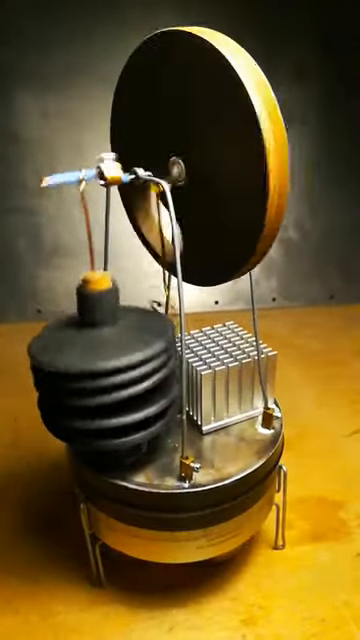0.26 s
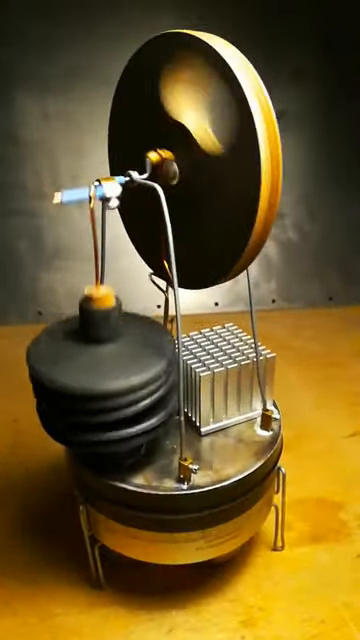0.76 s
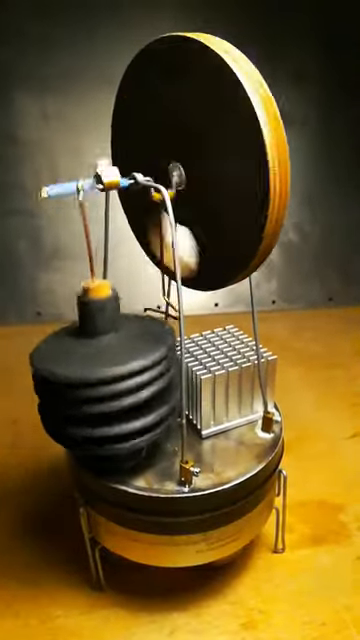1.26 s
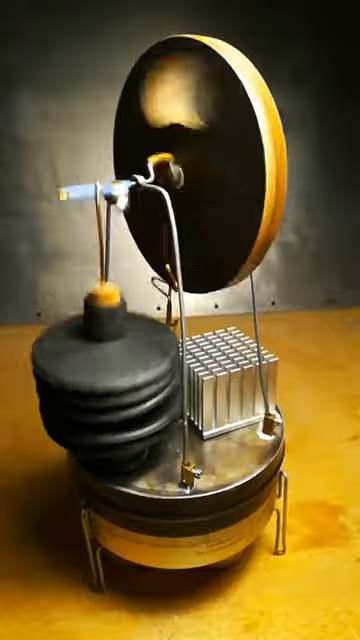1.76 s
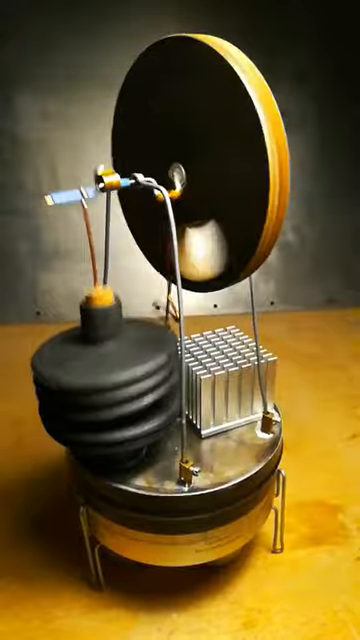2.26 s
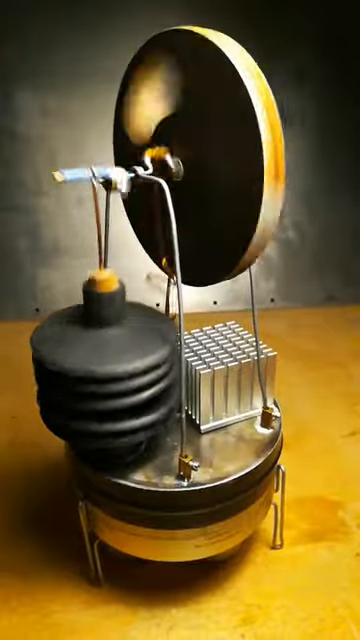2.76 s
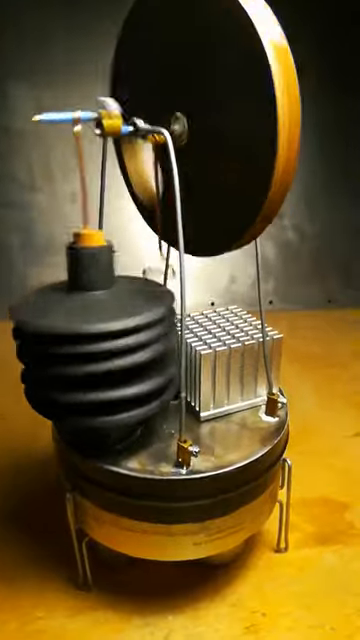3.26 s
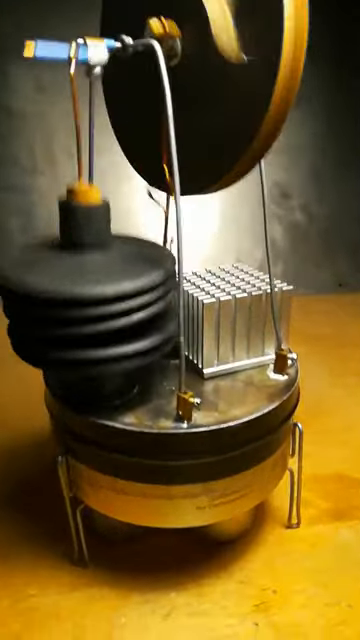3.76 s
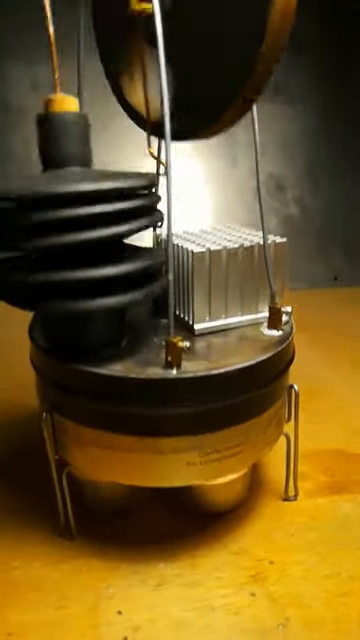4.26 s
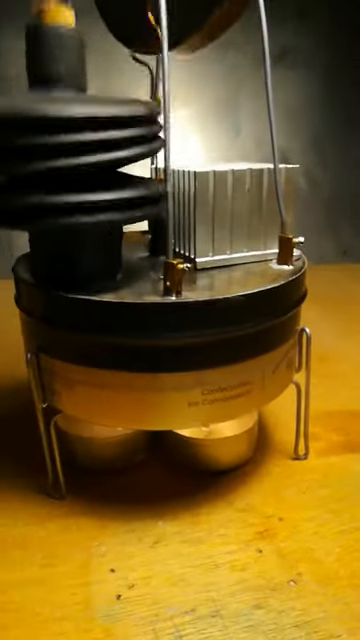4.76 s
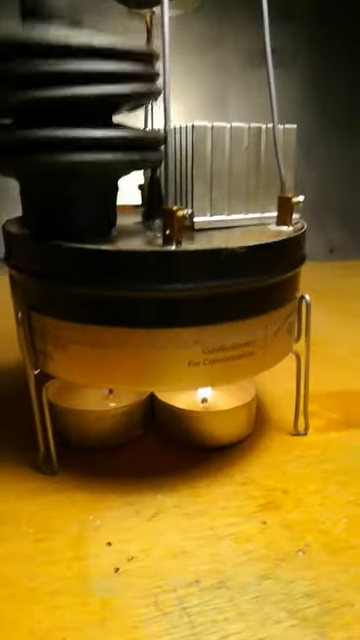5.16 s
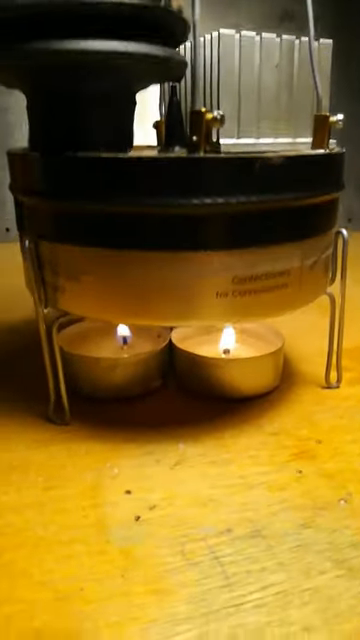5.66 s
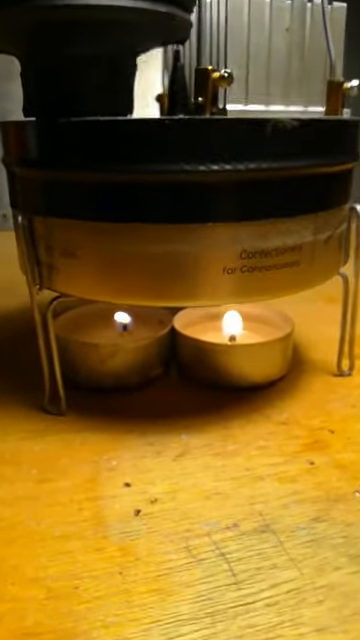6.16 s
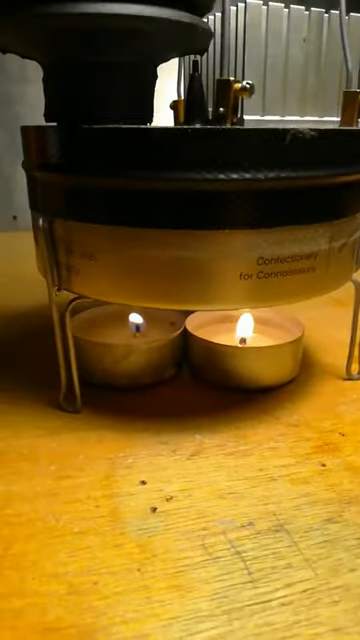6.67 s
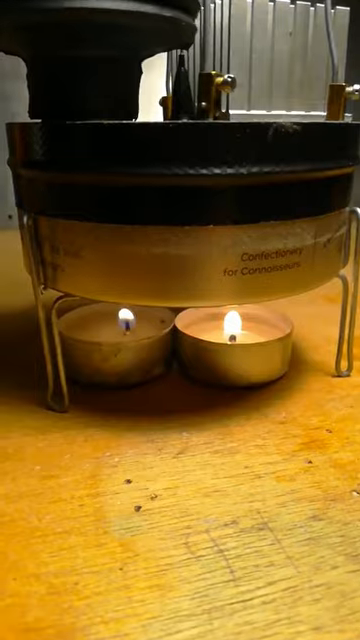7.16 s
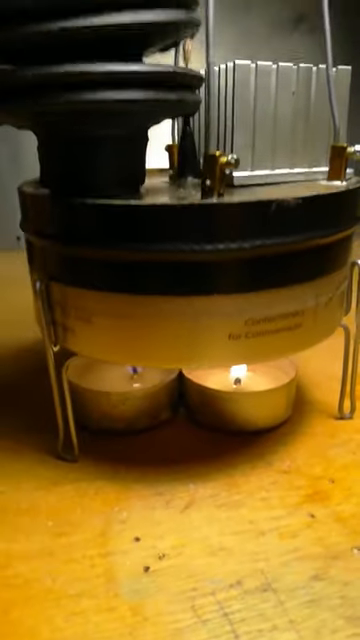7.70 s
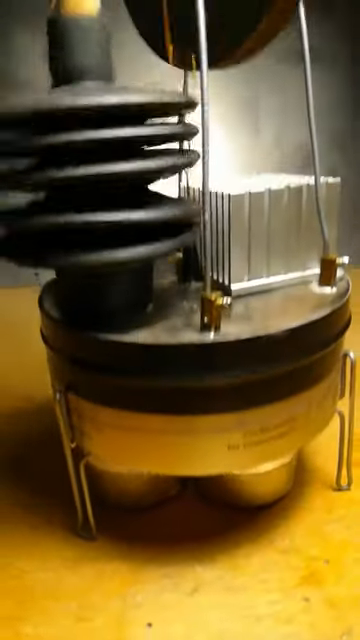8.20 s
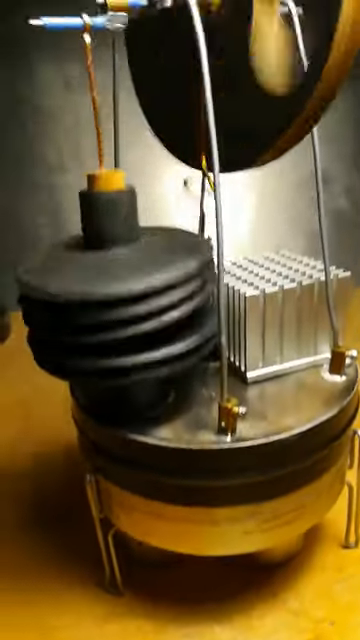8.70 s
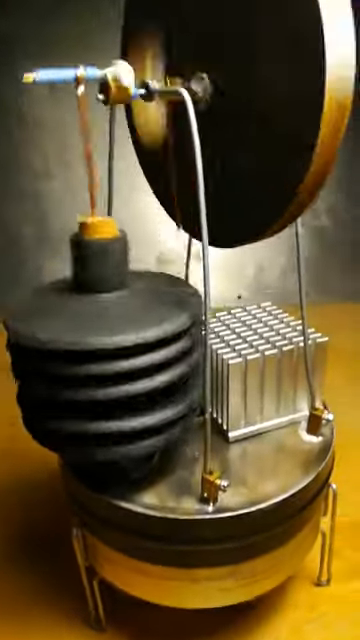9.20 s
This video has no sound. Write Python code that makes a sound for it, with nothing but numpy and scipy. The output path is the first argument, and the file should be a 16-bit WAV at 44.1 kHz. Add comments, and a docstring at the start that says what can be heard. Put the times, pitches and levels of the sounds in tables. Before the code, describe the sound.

A small homemade hot-air engine runs steadily, its loose wire linkage ticking and knocking five times a second over faint low room rumble.

```python
"""A rebound rattles over a low room rumble, then a small hot-air engine made from a tin runs on.
At five turns a second its loose linkage ticks, catches, knocks and rebounds; tin and wire frame ring.
Clicks and noise drive decaying modes and hissing bands; bright bursts are wire joints, a throb is the bench.
A hand-held two-port microphone sinks from above the tin to bench level and rises again."""
import sys
import numpy as np
from scipy import signal
from scipy.io import wavfile

SR = 44100
rng = np.random.default_rng(int(sys.argv[2]) if len(sys.argv) > 2 else 0)


def volts_from_decibels(level):
    """Turn decibel levels (scalar or array-like) into linear amplitude factors."""
    exponent = np.asarray(level, float) / 20
    return 10 ** exponent


def dump_mix(stems):
    """Bounce the given channels to the path in sys.argv[1] as a 16-bit WAV at rate SR."""
    frames = np.atleast_2d(stems).T  # one column per channel
    limited = np.clip(frames, -1, 1)  # hard clip at full scale
    pcm = np.round(limited * 32767).astype(np.int16)
    wavfile.write(sys.argv[1], SR, pcm)


N = 416304   # samples, about 9.44 s

# microphone height: t/s, share of the way down (0 above the tin, 1 bench level)
MIC_LOWERED = [(0, 0.02), (3.6, 0.06), (4.3, 0.32), (4.9, 0.78), (5.7, 0.91), (7.7, 1), (8.2, 0.86),
               (8.9, 0.1), (9.44, 0.1)]
# half of a left-minus-right difference goes to each port
SIDES = np.array([[.5], [-.5]])

# room noise density: f/Hz, relative level/dB per Hz
ROOM_SPECTRUM = [(15, -42), (25, -3), (82, 15.5), (427, -3.5), (516, 2.5), (1070, -2), (2110, -17),
                 (2690, -18.5), (5280, -22.5), (7110, -26), (10400, -29), (14000, -38), (16000, -50)]
# how alike the room sounds at both ports: f/Hz, likeness (1 = the same)
ROOM_LIKENESS = [(60, 0.84), (130, 1), (300, 0.44), (800, 0.1), (3000, .01)]
ROOM_DB = -51.5   # whole room noise, rms
# bench modes: f/Hz, level/dB, t60/s
BENCH_MODES = [(69.8, -50, 0.41), (75, -54, 0.39), (86.6, -54.5, 0.56), (130.7, -49, 0.67),
               (158.1, -47, 0.51), (200, -53.5, 0.2)]

# bright bursts of the wire joints: t/s, level/dB
SNAP_LEVEL = [(0, -55), (2.5, -51), (5, -45), (7.5, -44), (9.44, -42)]
SNAP_BEFORE_KNOCK_S, SNAP_T60_S, SNAP_SCATTER_DB = 0.008, 0.034, 2.5
CONTACT_SNAP_DB = -4.5   # relative to the burst before the knock
SNAP_FROM_DB = -42   # fainter contacts do not spit
SNAP_LEAN_DB, SNAP_LOW_LEAN_DB = 2, 8.5   # left minus right; added at bench level
SNAP_LOW_HZ, SNAP_HIGH_HZ = 8200, 15400

# dense small modes of rods and fins, from above and from bench level: f/Hz, relative level/dB per Hz
HISS_ABOVE = [(350, -33), (600, 3), (1100, -3.5), (1230, -6), (1410, -5.5), (2070, -28), (2800, -12),
              (3730, -21.5), (6730, -16.5), (10500, -33), (13900, -36), (16000, -49)]
HISS_BENCH = [(350, -36), (600, -13.5), (801, -0.5), (1180, -6), (1310, -6.5), (2070, -30), (2720, -11),
              (3120, -19), (6370, -18.5), (10900, -29), (12700, -26), (16000, -44)]
# their left-right balance, from above and from bench level: f/Hz, left minus right/dB
LEAN_ABOVE = [(700, -6.5), (2400, -1), (4400, -3), (8100, -2.5), (15000, 1)]
LEAN_BENCH = [(700, 11), (2400, 2), (4400, 3.2), (8100, 4.5), (15000, 9.9)]
HISS_DB, HISS_BENCH_DB = 13.5, 0.5   # added to both spectra; to the bench-level one only

# the main knock of every turn: t/s, strength/dB
KNOCKS = [(-0.026, -17), (0.1764, -21), (0.3731, -15.5), (0.5742, -13.5), (0.7729, -13), (0.97, -11.5),
          (1.1673, -15), (1.3626, -18.5), (1.5597, -26.5), (1.7556, -16.5), (1.9515, -15.5), (2.1501, -14),
          (2.3489, -13.5), (2.547, -35), (2.7432, -27), (2.9342, -16.5), (3.1697, -16), (3.3684, -15),
          (3.5635, -21.5), (3.7594, -16.5), (3.9548, -14), (4.153, -13), (4.3513, -11.5), (4.556, -11.5),
          (4.7528, -16.5), (4.9551, -12.5), (5.156, -16.5), (5.3544, -13), (5.5512, -13.5), (5.7499, -12),
          (5.9501, -12.5), (6.152, -14), (6.352, -14), (6.5526, -16), (6.7533, -17.5), (6.9518, -15),
          (7.1523, -15.5), (7.3523, -15.5), (7.5548, -16), (7.7546, -18.5), (7.9531, -13.5),
          (8.1546, -13.5), (8.3546, -15.5), (8.5543, -14.5), (8.755, -14.5), (8.955, -17.5), (9.1557, -19),
          (9.358, -15.5)]
# play in the linkage: t/s, tick leads the knock by/s, rebound follows it by/s
PLAY = [(0.18, .0343, .026), (.37, .0336, .037), (.57, .0388, .034), (.77, .0413, .027), (.97, .0428, .025),
        (1.17, .0422, .032), (1.36, .038, .032), (1.56, .0384, .031), (1.95, .040, .034),
        (2.2, .0443, .031), (2.74, .041, .030), (2.93, .0374, .035), (3.37, .0468, .030),
        (3.56, .0437, .034), (3.76, .0435, .035), (3.95, .0436, .026), (4.3, .0465, .030),
        (4.55, .0504, .029), (4.75, .0455, .038), (8.5, .0452, .037), (9.4, .045, .035)]
CATCH_AFTER_TICK_S, CATCH_JITTER_S = .0217, .0014
# rows tick, catch, knock, rebound: strength/dB, its change at bench level/dB, its scatter/dB,
# share above 2 kHz/dB, its change at bench level/dB, treble lost per dB of extra strength/dB
# (the knock takes its strength from KNOCKS instead)
STRENGTH = [(-30.5, 0.5, 1.4, -1, 0.4, -0.17), (-33.5, 5, 2.5, -5.5, -5.5, 0.17),
            (0, 0, 0, -6.5, -5.5, 0.26), (-23.5, 2, 1.35, -13, -6, 0.75)]
KNOCK_USUAL_DB = -16   # a knock above this has extra strength
# faint loose ticks: t/s, level/dB, share above 2 kHz/dB
STRAY_TICKS = [(3.064, -40.5, -11), (3.107, -47, -10), (3.697, -57, -13), (4.486, -60, -12),
               (4.69, -49, -9), (6.297, -55, -20), (6.68, -53, -18), (6.88, -61, -24), (9.088, -61, -23)]
# how each contact is struck, rows tick, catch, knock, rebound: rise/s, chatter t60/s, first blow/dB,
# rattle/dB, rattle swell/s, rattle t60/s, hiss/dB
CONTACT = [(0.00096, 0.02, -0.5, -9, 0.0051, 0.13, -9.5), (0.0014, 0.028, -2.5, -0.5, 0.009, 0.2, 6.5),
           (0.00026, 0.024, 4, -14.5, 0.0039, 0.098, -1.5), (0.00054, 0.027, 1.5, -7.5, 0.005, 0.21, 7)]

# tin and frame modes: f/Hz, then relative level/dB when ticked, caught, knocked, rebounding
BODY_MODES = [(194.2, -15, -21.5, -40, -20), (271, -17, -41, -21, -20.5), (313.3, -23, -23, -27, -21.5),
              (407, -30, -12.5, -29.5, -24.5), (520.2, -16, -15.5, -16.5, -11.5),
              (622, -18, -3.5, -13.5, -14), (730.3, -14, -5.5, -12.5, -7.5), (788.5, -4.5, 1.5, -6, -5.5),
              (874.4, -13.5, -1.5, -18.5, -14.5), (937.4, -5.5, -9, -18.5, -13.5),
              (1007, -5, -7, -22, -12.5), (1088.5, -23, -3.5, -12, -11), (1328, -14.5, -23, -8.5, -15),
              (1411.5, -24, -14, -13.5, -26), (1562, -18, -18, -16.5, -17.5), (1730, -31, -20, -24, -30),
              (1918, -53, -37, -43, -48.5), (2440, -6.5, -11, -41, -7.5), (2651, -12, -4.5, -26, -1.5),
              (2758, -14.5, -17, -7.5, -14.5), (3100, -23, -9.5, -55, -24), (3400, -19.5, -18.5, -28, -18),
              (3785, -23, -18.5, -27, -29), (4060, -7, -18, -18, -5.5), (4480, -19, -18, -20.5, -18),
              (4750, -12.5, -11.5, -17.5, -12), (5560, -62, -15, -25, -38), (6125, -31, -12.5, -22.5, -14),
              (6520, -16.5, -39, -14.5, -11), (7020, -21, -11, -15.5, -13.5), (7430, -14, -19, -20.5, -16),
              (7790, -11.5, -21, -11, -20)]
# each mode at the ports: from above left minus right/dB, left lead/rad;
# from bench level gain/dB, left minus right/dB, left lead/rad
PORTS = [(-2.5, 0.3, 1, 3, 1.26), (0, 0.26, 1.5, -1, 2.5), (-13.5, -0.45, -1.5, -2.5, 3),
         (7, 0, 5.5, 6.5, 4), (-5, -0.86, 6, 5.5, 4), (0, -1.7, 0.5, 3.5, 3), (3, -1.5, -1, 11, -2.5),
         (-6.5, -2, -1, 5.5, 3.5), (-5, 4, 1, 12.5, -3), (2, 0, 1.5, 16.5, -1.5), (5, 0, -4, 11.5, -1.5),
         (5, 0.34, -7, 6.5, -1), (-5, -1.5, -3, 4.5, 0.2), (19, 0.84, -12.5, 3, 1.9),
         (5.5, 1.4, -1, -1, 0.44), (0, -4.5, 6, 10.5, 3.5), (58, -0.5, 9.5, -29.5, -3),
         (7, 1.23, 3.5, 5.5, 2.2), (5, 1.63, 0, 0.5, 5), (-10.5, 2, -2, 6.5, -0.6), (-9, 0, 0.5, 8, -3.5),
         (10, 4, 7, 12.5, -0.5), (-16, -2, 2, 16.5, 0), (3, 2, -3, 10, 4), (-8, -4.5, 2, 13, -4.5),
         (1, 1.5, -3, 16, -3), (-6, 1.5, -6.5, 3, 1), (-14, 4, -1, 16.5, -2.5), (-11.5, 1.47, -9, 15, 1.5),
         (-13.5, 3.5, -4.5, 23, 0.6), (-16, 5, -28, 5, 9), (-8, 2.5, -13.5, 19, 0.5)]
BODY_DB = -5   # added to all modes
RING_S, RING_CYCLES = 0.02, 19.1   # a mode dies 60 dB in RING_S plus so many cycles

MAINS_HZ, NOTCH_WIDTH_HZ = 60, 9.7
CUTOFF_HZ = 16200   # the top is down 50 dB from here


def at_hz(points, hz):
    """Reads a spectrum on a log-frequency axis."""
    f, value = np.transpose(points)
    return np.interp(np.log(hz), np.log(f), value)


def band(x, low, high):
    """Keeps only the sound between two frequencies (Butterworth band-pass)."""
    edges = [low, min(high, SR / 2.2)]
    return signal.sosfilt(signal.butter(2, edges, "band", fs=SR, output="sos"), x)


def fading(x, t60):
    """Each impulse becomes a step that dies away by 60 dB in t60 seconds."""
    keep = volts_from_decibels(-60 / (max(t60, 1e-4) * SR))
    return signal.lfilter([1], [1, -keep], x + 1e-18)


def rising(x, rise):
    """Spreads each impulse over the rise time, keeping its area."""
    r = np.exp(-1 / (max(rise, 5e-5) * SR))
    return signal.lfilter([(1 - r) ** 2], [1, -2 * r, r * r], x + 1e-18)


def ring(force, hz, t60, q=1.59):
    """A struck mode as a decaying rotation, so that each port can hear it with its own phase."""
    turn = np.exp(2j * np.pi * hz / SR)
    wide = np.exp(-np.pi * hz / q / SR)   # a wide first stage rounds the start
    poles = np.convolve([1, -volts_from_decibels(-60 / (t60 * SR)) * turn], [1, -wide * turn])
    return signal.lfilter([-1j * (1 - wide)], poles, force)


def grains(per_s, spread_db):
    """Random clicks of uneven size and sign, total power one per millisecond."""
    sizes = volts_from_decibels(spread_db * np.minimum(rng.exponential(1, N), 4)) * rng.choice([-1, 1], N)
    clicks = sizes * (rng.random(N) < per_s / SR)
    return clicks / np.sqrt(np.mean(clicks ** 2) * SR / 1000)


def impulses(rows):
    """One impulse per row: t/s, level/dB."""
    rows, out = np.array(rows), np.zeros(N)
    out[(rows[:, 0] * SR).astype(int)] = volts_from_decibels(rows[:, 1])
    return out


def mic_lowered(t):
    """How far the hand has lowered the microphone: 0 above the tin, 1 at bench level."""
    return np.clip(np.interp(t, *np.transpose(MIC_LOWERED)), 0, 1)


def room():
    """Steady rumble and hiss: half-octave bands of noise, most alike at both ports in the bass."""
    out = 0
    edges = 25 * 2 ** np.arange(0, 9.6, .5)
    white = rng.standard_normal((2, 2, N))   # neighbouring bands take turns with two noises
    for k, (lo, hi) in enumerate(zip(edges, edges[1:])):
        mid, side = band(white[k % 2], lo, hi)
        hz = np.sqrt(lo * hi)
        alike = np.clip(at_hz(ROOM_LIKENESS, hz), -1, 1)
        both = np.sqrt(1 + alike) * mid + np.sqrt(1 - alike) * side * [[1], [-1]]
        out = out + volts_from_decibels(at_hz(ROOM_SPECTRUM, hz)) * both
    return volts_from_decibels(ROOM_DB) * out / np.std(out)


def bench():
    """Each turn shakes the wooden bench alike: its low modes throb at the turning rate."""
    push = impulses([(s, 0) for s, _ in KNOCKS if s >= 0])
    return sum(volts_from_decibels(db) * ring(push, hz, t60).real for hz, db, t60 in BENCH_MODES)


def snaps(blows, latest, low):
    """Thin wire joints spit a short bright noise burst at contacts and once more just before the knock."""
    chance = rng.standard_normal((2, latest.max() + 1))
    early = impulses([(s - SNAP_BEFORE_KNOCK_S, SNAP_SCATTER_DB * c)
                      for (s, _), c in zip(KNOCKS[1:], chance[0])])
    contact_size = volts_from_decibels(CONTACT_SNAP_DB + SNAP_SCATTER_DB * chance[1][latest])
    hits = early + (blows > volts_from_decibels(SNAP_FROM_DB)) * contact_size
    noise = fading(hits, SNAP_T60_S) * rng.standard_normal((2, N))
    burst = band(noise, SNAP_LOW_HZ, SNAP_HIGH_HZ)
    level_db = np.interp(np.arange(N) / SR, *np.transpose(SNAP_LEVEL))
    lean_db = SNAP_LEAN_DB + SNAP_LOW_LEAN_DB * low
    return volts_from_decibels(level_db + lean_db * SIDES) * burst


def fizz(envelope, low, ring_t60, clicky):
    """Modes too dense to part: clicks and noise under the contact envelope, in third-octave bands."""
    out = 0
    edges = 600 * 2 ** np.arange(0, 5, 1 / 3)
    tail = np.sqrt(rising(envelope ** 2, ring_t60 / 14))   # the power lingers a little
    clicks = grains(per_s=2900, spread_db=-0.5) * np.sqrt(SR / 1000)   # now of mean power one
    noise = tail * rng.standard_normal((2, 2, N)) + clicky * envelope * clicks
    for k, (lo, hi) in enumerate(zip(edges, edges[1:])):
        hz = np.sqrt(lo * hi)
        level_db = (1 - low) * at_hz(HISS_ABOVE, hz) + low * (at_hz(HISS_BENCH, hz) + HISS_BENCH_DB)
        lean_db = (1 - low) * at_hz(LEAN_ABOVE, hz) + low * at_hz(LEAN_BENCH, hz)
        out = out + volts_from_decibels(HISS_DB + level_db + lean_db * SIDES) * band(noise[k % 2], lo, hi)
    return out


def turns():
    """Rows (t/s, level/dB, treble share/dB) of tick, catch, knock and rebound, timed from each knock."""
    knock, knock_db = np.transpose(KNOCKS)
    at, lead, lag = np.transpose(PLAY)
    chance = rng.standard_normal((len(knock), 5))
    tick = knock - np.interp(knock, at, lead)
    catch = tick + CATCH_AFTER_TICK_S + CATCH_JITTER_S * chance[:, 4]
    rebound = knock + np.interp(knock, at, lag)
    low = mic_lowered(knock)
    tables = []
    for k, (s, strength) in enumerate(zip([tick, catch, knock, rebound], STRENGTH)):
        db, low_db, scatter_db, bright_db, low_bright_db, dulling = strength
        extra_db = scatter_db * chance[:, k]
        level_db = db + low_db * low + extra_db
        if s is knock:
            extra_db, level_db = knock_db - KNOCK_USUAL_DB, knock_db
        treble_db = bright_db + low_bright_db * low - dulling * extra_db
        rows = np.transpose([s, level_db, treble_db])
        tables.append([tuple(r) for r in rows if r[0] >= 0])
    return tables


def contacts():
    """First blows, rattle and hiss envelopes; kind and brightness per contact; latest contact per sample."""
    tables = turns()
    tables[0] = tables[0] + STRAY_TICKS
    blows, force, hiss = np.zeros((3, N))
    for rows, struck in zip(tables, CONTACT):
        rise, t60, blow_db, rattle_db, swell, rattle_t60, hiss_db = struck
        hit = impulses(rows)
        chatter = fading(rising(hit, rise), t60)
        rattle = volts_from_decibels(rattle_db) * fading(rising(hit, swell), rattle_t60)
        blows += volts_from_decibels(blow_db) * hit
        force += chatter + rattle
        hiss += volts_from_decibels(hiss_db) * (chatter + rattle)
    rows = np.array(sorted((s, kind, bright) for kind, t in enumerate(tables) for s, _, bright in t))
    latest = np.maximum(np.searchsorted(rows[:, 0] * SR, np.arange(N) + 1) - 1, 0)
    return blows, force, hiss, rows[:, 1].astype(int), rows[:, 2], latest


def scrapes(rate, depth_db):
    """Uneven grip of loose parts: a quick random gain, smoothed noise with its corner at rate Hz."""
    steps_per_s = 400
    steps = rng.standard_normal(int(N / SR * steps_per_s))
    r = np.exp(-2 * np.pi * rate / steps_per_s)
    slow = signal.lfilter([1], [1, -r], steps)
    sway = np.interp(np.arange(N) / SR * steps_per_s, np.arange(len(slow)), slow / np.std(slow))
    return volts_from_decibels(depth_db * sway)


def at_ports(z, gain_db, lean_db, lead):
    """Left and right port hear one mode with their own level and phase."""
    return volts_from_decibels(gain_db + lean_db * SIDES) * np.real(z * np.exp(1j * lead * SIDES))


def body(force, kind, bright_db, latest, low, scatter_db):
    """Tin and frame: each contact strikes every mode by its kind, a little different each time."""
    above, below = 0, 0
    scatter = rng.standard_normal((len(kind), len(BODY_MODES)))
    for k, ((hz, *colour_db), ports) in enumerate(zip(BODY_MODES, PORTS)):
        gain_db = np.array(colour_db)[kind] + bright_db * (hz > 2000) + scatter_db * scatter[:, k]
        z = ring(force * volts_from_decibels(gain_db)[latest], hz, RING_S + RING_CYCLES / hz)
        above = above + at_ports(z, 0, *ports[:2])
        below = below + at_ports(z, *ports[2:])
    return volts_from_decibels(BODY_DB) * (np.sqrt(1 - low) * above + np.sqrt(low) * below)


def scene():
    """Adds up engine, wire joints, bench and room as the microphone moves."""
    low = mic_lowered(np.arange(N) / SR)
    blows, force, hiss, kind, bright_db, latest = contacts()
    grip = scrapes(rate=153, depth_db=2.0)
    chatter = blows + force * grip * grains(per_s=3000, spread_db=3.0)
    engine = body(chatter, kind, bright_db, latest, low, scatter_db=1.3)
    hiss_envelope = hiss * grip * volts_from_decibels(bright_db)[latest]
    engine += fizz(hiss_envelope, low, ring_t60=0.0063, clicky=0.4)
    return engine + snaps(blows, latest, low) + bench() + room()


def low_pass(x):
    """Removes everything above the highest recorded frequency."""
    return signal.sosfilt(signal.butter(12, 16310, fs=SR, output="sos"), x)


def record(dry):
    """A hum filter notches the mains frequency and seven overtones, then the top is cut."""
    for k in range(1, 9):
        notch = signal.iirnotch(k * MAINS_HZ, k * MAINS_HZ / NOTCH_WIDTH_HZ, SR)
        dry = signal.lfilter(*notch, dry)
    mix = signal.sosfilt(signal.cheby2(10, 50, CUTOFF_HZ, fs=SR, output="sos"), dry)
    return low_pass(mix)


dry = scene()
out = record(dry)
dump_mix(out)
```